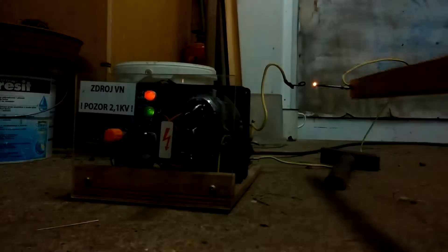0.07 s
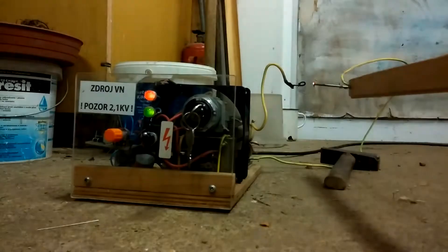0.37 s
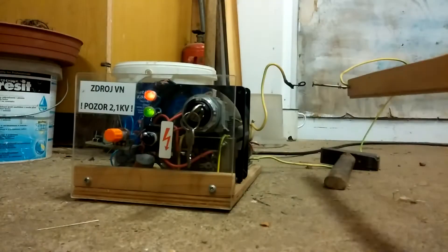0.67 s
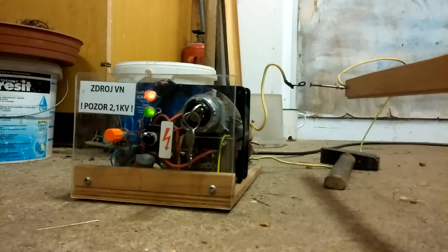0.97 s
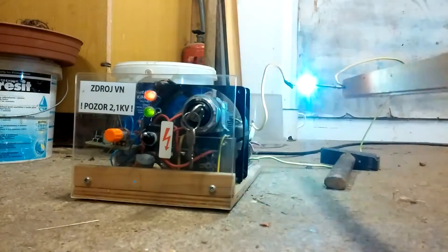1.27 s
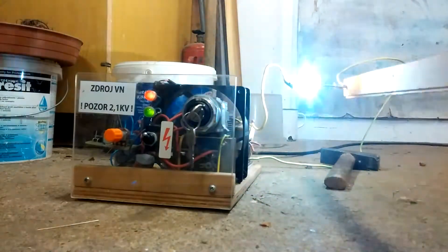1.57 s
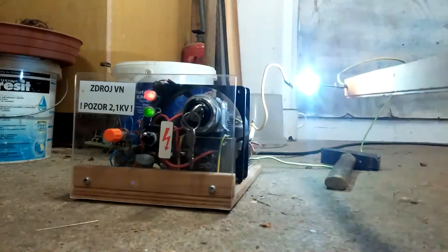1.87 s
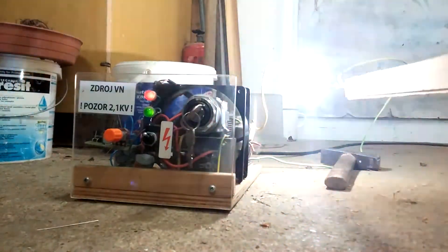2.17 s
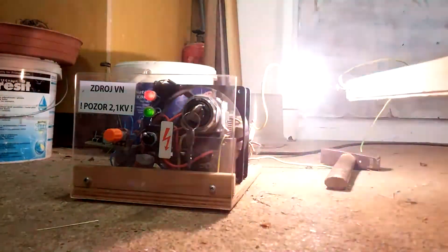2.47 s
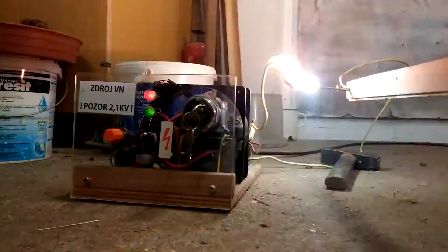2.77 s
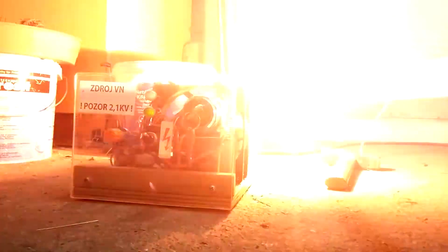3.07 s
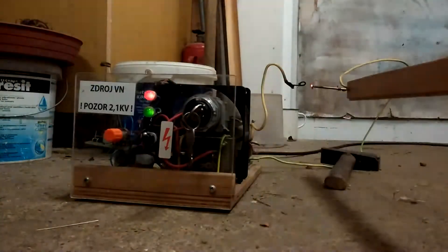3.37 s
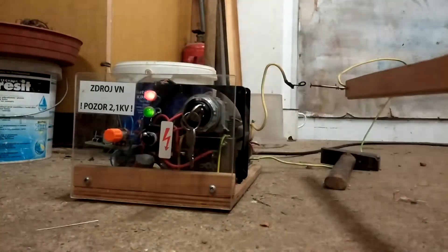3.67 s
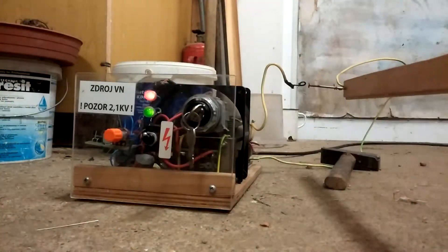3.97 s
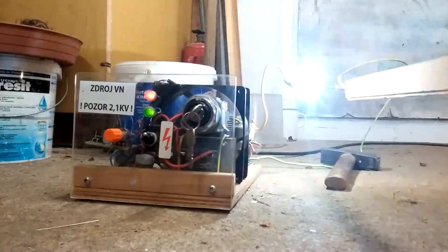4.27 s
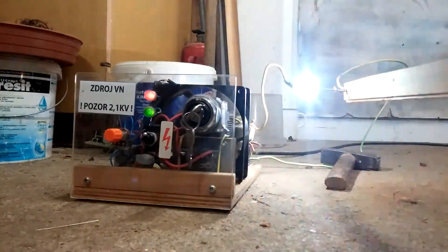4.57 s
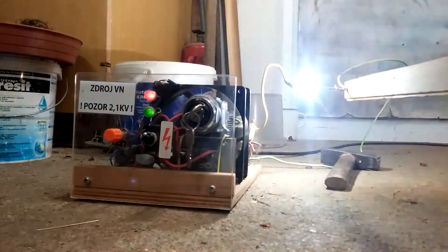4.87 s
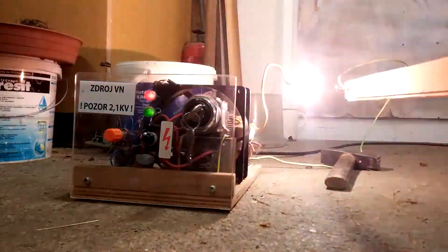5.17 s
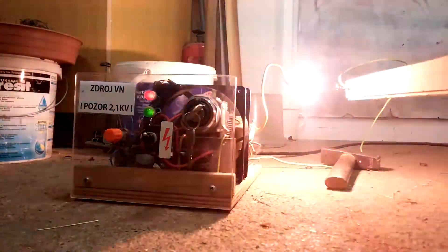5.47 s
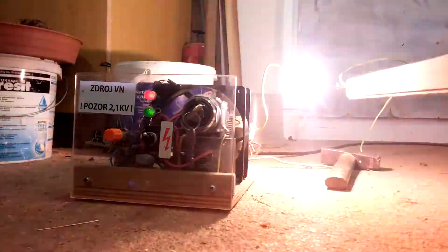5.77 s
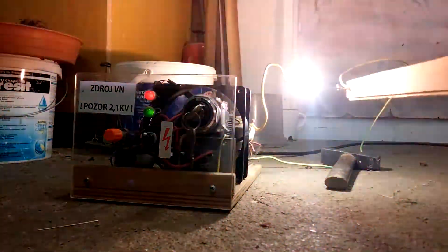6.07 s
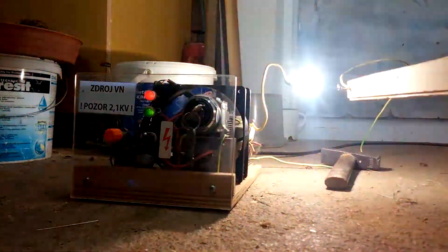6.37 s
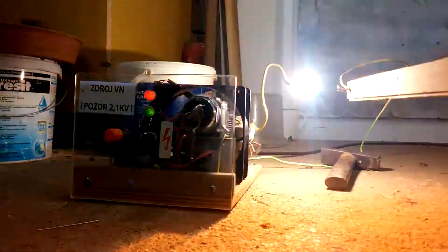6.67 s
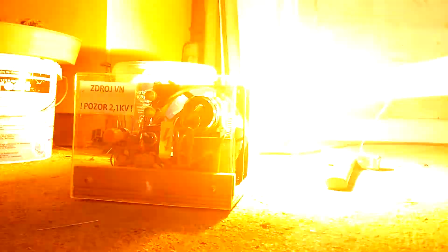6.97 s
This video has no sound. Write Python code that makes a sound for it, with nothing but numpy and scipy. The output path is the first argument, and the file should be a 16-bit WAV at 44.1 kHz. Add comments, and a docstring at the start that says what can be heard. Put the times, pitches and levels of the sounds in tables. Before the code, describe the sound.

Close by in a small workshop, an electric arc cuts off with a snap, leaving a faint transformer hum, a softly rattling fan and one dull knock. The arc strikes with a crack, buzzes and sizzles harshly, then throbs and snaps until it goes out. After a second of hum it strikes again and builds to a longer run of loud, rapid snaps.

```python
"""High-voltage arc in a small workshop

An arc is drawn twice from a mains transformer, close to the microphone. The current passes through zero
every half cycle, and the arc relights with a thud and a spit of sizzle. Drawn long, it bows into a
throbbing flame that swells until a shorter path strikes with a snap. A cooling fan and the humming
transformer run throughout, and there is one dull knock early on."""
import sys
import numpy as np
from scipy import signal
from scipy.fft import rfft, irfft
from scipy.io import wavfile
from scipy.ndimage import uniform_filter1d

SR = 44100
rng = np.random.default_rng(int(sys.argv[2]) if len(sys.argv) > 2 else 0)


def int16_out(signal):
    """Quantize to a 16-bit WAV file."""
    q = np.round(np.clip(np.atleast_2d(signal).T, -1, 1) * 32767)
    wavfile.write(sys.argv[1], SR, q.astype(np.int16))


N = 309582
T = np.arange(N) / SR
MAINS_HZ, CURRENT_ZERO_S = 49.98, .0038
SOFTENING_DB = 34.5  # loss of sizzle and stray sparks per unit of flame amplitude

# collapses of the bowed flame: t/s, flame level reached/dB, snap level/dB
FLARES = [(0.0126, -6, -6.5), (2.345, -17, -22), (2.4442, -11.5, -11), (2.605, -11, -3), (2.829, -11, -4),
          (2.942, -16.5, -14), (3.026, -13, 8.5), (3.141, -9.5, -31), (5.4268, -13.5, 5),
          (5.5087, -14.5, 2.5), (5.6076, -13, 8), (5.727, -15, -2.5), (5.889, -10, 9.5), (6.008, -14.5, 5),
          (6.1277, -16.5, -0.5), (6.2284, -13.5, 4), (6.328, -12, -2), (6.4073, -13, 4.5),
          (6.4939, -13, -1), (6.6086, -12.5, 9.5), (6.6869, -13.5, 2), (6.807, -12.5, -3.5),
          (6.9277, -12, -0.5), (7.04, -10, -10)]
# bright sparks across the short gap: t/s, level/dB
SPARKS = [(1.288, 13.5), (1.3463, -6), (1.6566, 10), (1.722, 8), (1.8338, 6), (1.902, 7), (4.0775, 6),
          (4.2638, 7), (4.928, 1), (4.9877, 1)]


def buzz(relights, flame):
    """A pulse train sounds harmonic: each relighting thuds, softer and less regular in a long flame."""
    # spectrum of a thud: f/Hz, level/dB
    thud_spectrum = [(40, -24), (100, -11), (200, -15), (490, -18), (600, .5), (700, 1.5), (800, -3),
                     (900, -9), (1000, -1.5), (1100, -10), (1250, -11), (2300, -26), (2700, -16),
                     (3300, -36)]
    jitter, scatter = rng.standard_normal((len(relights), 2)).T
    polarity = (-1) ** np.arange(len(relights))
    times = relights + jitter * (.00003 + .00076 * flame)
    sizes = undb(1.8 * scatter + 1.1 * polarity - 32 * flame)
    thuds = -unit(colour(pulses(times, sizes), thud_spectrum))
    return room(thuds * arc_gain(touching_db=-33, drawn_db=-22.5), wet_db=-14, t60=.2)


def spit(relights, flame_amplitude):
    """Amplitude-modulated noise: the electrodes spit at each relighting, harder on one polarity."""
    # spectrum of the sizzle: f/Hz, level/dB
    sizzle_spectrum = [(500, -30), (3200, -13), (4400, -2.5), (5500, -1), (7000, -1.5), (8200, 0),
                       (9500, -6), (11000, -13), (16000, -25)]
    # spectrum of the highest fizz: f/Hz, level/dB
    fizz_spectrum = [(3000, -40), (8000, -14), (10500, -4), (12000, -3), (14000, 0), (16000, -1)]
    # spectrum of the lower crackle: f/Hz, level/dB
    crackle_spectrum = [(150, 5.5), (500, 7), (1000, -8), (1600, 3), (2100, 2), (2700, 3), (3200, -7),
                        (5000, -27), (12000, -24)]
    scatter, lag1, scatter1, lag2, scatter2, gush_lag, gush_scatter = rng.uniform(
        -1, 1, (len(relights), 7)).T
    polarity = (-1) ** np.arange(len(relights))
    size = undb(1.2 * polarity + 2.7 * scatter)
    # one gush of hiss and two tiny cracks in each half cycle
    gushes = pulses(relights - .0019 + .00057 * gush_lag, size * undb(2 * gush_scatter))
    cracks = pulses(relights + .0008 * lag1, size * undb(4.5 * scatter1))
    cracks += pulses(relights + .0013 + .0009 * lag2, .6 * size * undb(4.5 * scatter2))
    envelope = .22 + convolve(gushes, fade(.0017)) + 5 * convolve(cracks, fade(.00012))
    # the transformer's limited current keeps the power even over several cycles
    envelope /= np.sqrt(uniform_filter1d(envelope ** 2, int(.07 * SR)))
    sizzle = colour(noise() * envelope, sizzle_spectrum) * arc_gain(touching_db=-24.5, drawn_db=-27)
    fizz = colour(noise() * envelope, fizz_spectrum) * arc_gain(touching_db=-21.5, drawn_db=-30)
    crackle = colour(noise() * envelope, crackle_spectrum) * arc_gain(touching_db=-34.5, drawn_db=-33)
    snap_surge, spark_surge = surge(FLARES, depth=.31), surge(SPARKS, depth=.38)
    # a long flame burns softly
    treble = (sizzle * snap_surge + fizz * spark_surge) * undb(-SOFTENING_DB * flame_amplitude)
    crackle *= snap_surge * undb(-4 * flame_amplitude)
    return room(treble, wet_db=-1, t60=.22) + room(crackle, wet_db=3.5, t60=.28)


def ringing(hiss):
    """Resonance: the electrode rod and the case ring at their modes, driven by the arc."""
    # modes of rod and case: f/Hz, bandwidth/Hz, level/dB
    modes = [(2700, 50, 0), (4300, 60, -3), (4700, 70, -7), (5270, 70, -2), (6400, 80, -5), (12260, 70, -5)]
    return sum(undb(db) * signal.lfilter(*signal.iirpeak(hz, hz / width, fs=SR), hiss)
               for hz, width, db in modes)


def snaps(relights, stray_share=.06):
    """Electrical breakdown launches a shock front, with a brief tearing noise behind it."""
    # spectrum of the bright crack: f/Hz, level/dB
    crack_spectrum = [(1500, -12), (3300, -12), (4600, 3.5), (8200, 14), (10500, -6), (14000, 10.5),
                      (16000, -7)]
    # spectrum of the full-bodied bang: f/Hz, level/dB
    bang_spectrum = [(100, 3), (500, -1.5), (1500, 3.5), (2700, 1.5), (3500, 0.5), (6000, 3.5),
                     (12000, -12)]
    collapse_s, _, snap_db = np.transpose(FLARES)
    spark_s, spark_db = np.transpose(SPARKS)
    # a few relightings throw a stray spark, fainter across a long gap
    strays = (rng.random(len(relights)) < stray_share) * gap_gain(relights, touching_db=2, drawn_db=-5)
    strays *= undb(4 * rng.standard_normal(len(relights)) - SOFTENING_DB * flame_gain(relights))
    snap = pulses(collapse_s, undb(snap_db))
    spark = pulses(spark_s, undb(spark_db)) + pulses(relights, strays)
    # a spark has little bang; a snap has both bang and crack
    crack = spark + undb(-5.5) * snap
    bang = snap + undb(-18.5) * spark
    shock = colour(crack, crack_spectrum) + undb(2.5) * colour(bang, bang_spectrum)
    tearing = colour(noise() * convolve(crack, fade(.0003)), crack_spectrum)
    rip = colour(noise() * convolve(bang, fade(.00063)), bang_spectrum)
    return room(shock, wet_db=0, t60=.28) + undb(-14) * tearing + undb(-10) * rip


def throb(relights, flame):
    """Thermal contraction: the hot column shrinks at each current zero, for longer in a long flame."""
    scatter, jitter = rng.standard_normal((len(relights), 2)).T
    pressure = np.zeros(N)
    for at, size, lag_s in zip(relights, flame * undb(.47 * scatter), .0001 * jitter):
        near = slice(max(int((at - .01) * SR), 0), int((at + .01) * SR))
        t = T[near] - at
        width_s = .00061 + .0033 * size
        dip = np.exp(-np.abs((t - lag_s) / width_s) ** np.e)
        # the gas expands again between the dips, so the mean pressure stays put
        refill = np.cos(np.pi * MAINS_HZ * t) ** 2 * dip.sum() / (SR / MAINS_HZ / 2)
        pressure[near] += size * (refill - dip)
    return undb(9) * pressure


def flutter():
    """Turbulence in the flame radiates low noise in proportion to the flame's amplitude."""
    # spectrum of the turbulence: f/Hz, level/dB
    spectrum = [(20, -6), (70, -2), (200, -4), (400, 2), (700, -5), (1500, -10), (2400, -19), (5000, -38)]
    turbulence = unit(colour(noise(), spectrum)) * flame_gain(T)
    return undb(-10) * room(turbulence, wet_db=-3, t60=.25)


def thumps(hz=86):
    """Rarefaction: the hot gas of a short-circuited flame caves in with a low, damped thump."""
    collapse_s, flame_db, _ = np.transpose(FLARES)
    decay = fade(.025)
    thump = -np.sin(2 * np.pi * hz * T[:len(decay)]) * decay
    return undb(-3) * convolve(pulses(collapse_s, undb(flame_db)), thump)


def flame_gain(t, swell_db_per_s=128.5):
    """Exponential growth: the flame swells out of a small steady one up to each collapse."""
    collapse_s, flame_db, _ = np.transpose(FLARES)
    coming = np.minimum(np.searchsorted(collapse_s, t), len(collapse_s) - 1)
    flare = undb(flame_db[coming] + swell_db_per_s * (t - collapse_s[coming])) * burning(t)
    return np.maximum(flare, gap_gain(t, touching_db=-51, drawn_db=-30.5))


def burning(t):
    """Gating: 1 while the arc conducts, otherwise 0."""
    # spans in which the arc burns: strike t/s, extinction t/s
    burns = [(-.1, .02), (1.286, 3.141), (4.076, 7.1)]
    return sum((t >= on) & (t < off) for on, off in burns)


def gap_gain(t, touching_db, drawn_db):
    """Arc length governs level: linear in decibels from electrodes touching to fully drawn."""
    # the hand draws the electrode away: t/s, gap/full gap
    gap_path = [(0, 0.98), (1.29, 0), (1.46, 0.05), (1.53, 1), (1.6, 0.76), (1.66, 0.34), (2.05, 0.54),
                (2.22, 0.92), (3.14, 0.97), (4.08, 0), (4.22, 0), (4.35, 0.68), (4.46, 0.2), (4.58, 0.22),
                (4.8, 0.73), (4.92, 0.45), (5.1, 0.99), (5.3, 0.83), (7.0, 0.77)]
    gap = np.interp(t, *np.transpose(gap_path))
    return undb(touching_db + (drawn_db - touching_db) * gap) * burning(t)


def arc_gain(touching_db, drawn_db, waver_db=.97, waver_hz=16):
    """Random modulation: the level set by the gap wavers as the arc wanders over the electrodes."""
    waver = np.interp(T * waver_hz, np.arange(512), rng.standard_normal(512))
    return gap_gain(T, touching_db, drawn_db) * undb(waver_db * waver)


def surge(breakdowns, depth, decay_s=.019):
    """Relaxation: the electrodes spit harder after each breakdown, then the gain sinks back to 1."""
    rows = np.array(breakdowns)
    return 1 + depth * convolve(pulses(rows[:, 0], undb(rows[:, -1])), fade(decay_s))


def fan(tick_hz=114.46):
    """Blade tones and beating: the motor's ticks beat with the rectified mains in a slow rattle."""
    # harmonics of the blade passage: f/Hz, level/dB
    blade_tones = [(143, -35.5), (286, -48), (429, -53), (573, -54)]
    # spectrum of a motor tick: f/Hz, level/dB
    tick_spectrum = [(150, -10), (300, -4), (600, -8), (1000, -3.5), (1480, 0), (1900, -12), (2400, -2.5),
                     (2900, -20), (8000, -35)]
    tones = sum(np.sqrt(2) * undb(db) * np.sin(2 * np.pi * (hz * T + rng.random()))
                for hz, db in blade_tones)
    tick_s = np.arange(0, N / SR, 1 / tick_hz)
    ripple = np.sin(2 * np.pi * MAINS_HZ * tick_s) ** 2 + .55
    ticks = pulses(tick_s, ripple)
    rattle = unit(ticks) + 1.02 * unit(noise() * convolve(ticks, fade(.00052)))
    return tones + undb(-38.5) * unit(room(colour(rattle, tick_spectrum), wet_db=5, t60=.024))


def transformer():
    """Forced vibration: the core hums at twice the mains frequency; its laminations slap and buzz."""
    # spectrum of a lamination slap: f/Hz, level/dB
    slap_spectrum = [(1000, -35), (2800, -22), (3200, -8), (3800, -10), (4400, -15), (5000, -7), (5600, 0),
                     (6300, -3), (7200, -12), (9000, -20), (16000, -28)]
    hum = -np.sqrt(2) * np.cos(4 * np.pi * MAINS_HZ * (T - CURRENT_ZERO_S))
    half_cycles = np.arange(0, N / SR, .5 / MAINS_HZ)
    slaps = pulses(half_cycles, 1) + pulses(half_cycles + .00512, .45)
    core_buzz = unit(room(colour(slaps, slap_spectrum), wet_db=-6, t60=.05))
    return undb(-39) * hum + undb(-44.5) * core_buzz


def knock(at_s=.378):
    """A damped transient: a short burst of low noise is heard as a soft, dull knock."""
    # spectrum of the knock: f/Hz, level/dB
    spectrum = [(60, -14), (200, 7), (320, -5), (700, -8), (2400, -18), (9000, -30)]
    blow = noise() * convolve(pulses(np.array([at_s]), .94), fade(.03))
    return undb(-24) * room(colour(blow, spectrum), wet_db=-1, t60=.3)


def air():
    """Stationary noise: a low, even rush fills the workshop."""
    # spectrum of the background: f/Hz, level/dB
    spectrum = [(12, -21), (20, -0.5), (53, -4), (146, -8), (234, -11.5), (624, -20), (1480, -14),
                (1910, -29), (2390, -23.5), (4540, -28.5), (5530, -26.5), (14700, -32.5), (16000, -29)]
    return undb(-35) * unit(colour(noise(), spectrum))


def room(x, wet_db, t60):
    """Reverberation: direct sound plus dense reflections from floor and near walls, at constant power."""
    tail = (noise() * undb(-60 * T / t60) * (T > .0008))[:SR // 2]
    response = undb(wet_db) * tail / np.linalg.norm(tail)
    response[0] = 1
    return convolve(x, response / np.linalg.norm(response))


def colour(x, points, size=4096):
    """Minimum-phase filter of unit energy, shaped by points of f/Hz, level/dB."""
    hz, db = np.transpose(points)
    bin_hz = np.arange(size // 2 + 1) * SR / size
    gain = undb(np.interp(np.log(bin_hz + 1), np.log(hz), db))
    # folding the cepstrum onto positive time makes the response causal
    cepstrum = irfft(np.log(gain))
    cepstrum[1:size // 2] *= 2
    cepstrum[size // 2 + 1:] = 0
    response = irfft(np.exp(rfft(cepstrum)))
    return convolve(x, response / np.linalg.norm(response))


def pulses(times, sizes):
    """Impulse train: one impulse at each time."""
    train = np.zeros(N)
    inside = (times >= 0) & (times < (N - 1) / SR)
    np.add.at(train, (times[inside] * SR).astype(int), (sizes * np.ones(len(times)))[inside])
    return train


def fade(seconds):
    """Exponential decay, eight time constants long."""
    return np.exp(-T[T < 8 * seconds] / seconds)


def convolve(x, response):
    """Convolution: the output of a linear system with this impulse response."""
    return signal.fftconvolve(x, response)[:N]


def noise():
    """White Gaussian noise."""
    return rng.standard_normal(N)


def unit(x):
    """Normalisation to rms 1."""
    return x / np.sqrt(np.mean(x ** 2))


def undb(db):
    """Amplitude ratio of a level in decibels."""
    return 10 ** (np.asarray(db) / 20)


def scene():
    """Superposition: the arc, timed by the mains current, adds to the workshop's background."""
    current_zeros = CURRENT_ZERO_S + np.arange(0, N / SR, .5 / MAINS_HZ)
    # a flame that collapses just after a current zero no longer throbs in that half cycle
    flame = flame_gain(current_zeros + .003)
    # a longer arc needs more voltage, so it relights later in the half cycle
    relights = current_zeros + .004 * flame
    arc = buzz(relights, flame) + throb(relights, flame) + flutter() + thumps()
    hiss = spit(relights, flame_gain(T))
    arc += hiss + ringing(hiss) + snaps(relights)
    return (arc + fan() + transformer() + knock() + air())[None]


def record(dry, top_hz=15900):
    """Saturation and band limiting: the loudest snaps overload the microphone; the top is cut."""
    low_pass = signal.ellip(10, .2, 80, top_hz, fs=SR, output="sos")
    return signal.sosfilt(low_pass, np.clip(dry, -1, 1))


dry = scene()
out = record(dry)
int16_out(out)
```